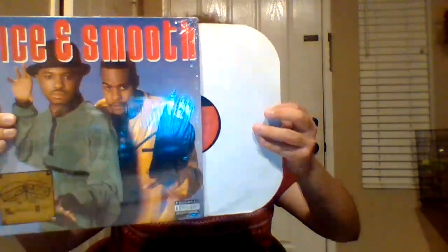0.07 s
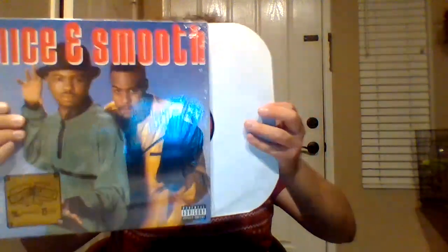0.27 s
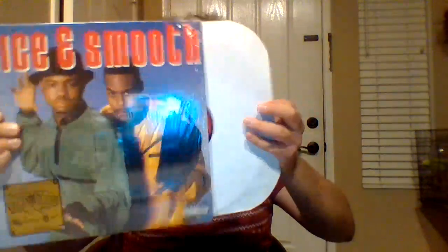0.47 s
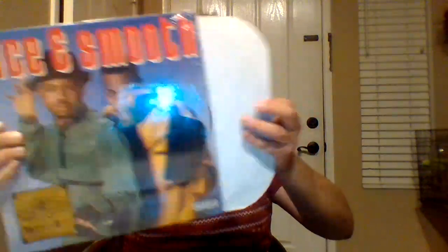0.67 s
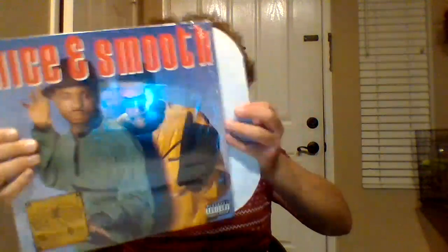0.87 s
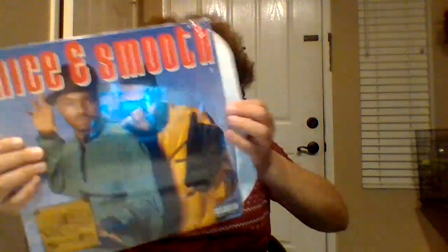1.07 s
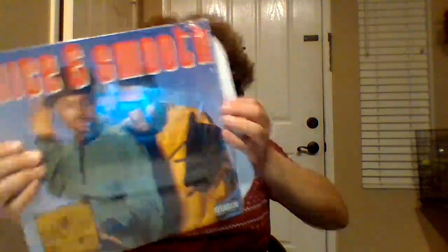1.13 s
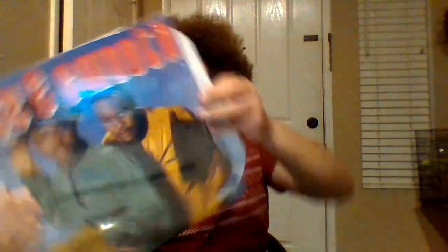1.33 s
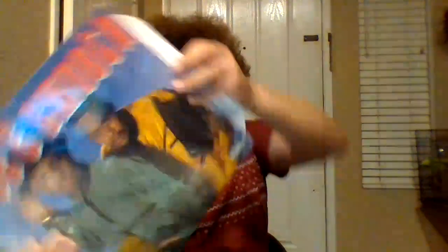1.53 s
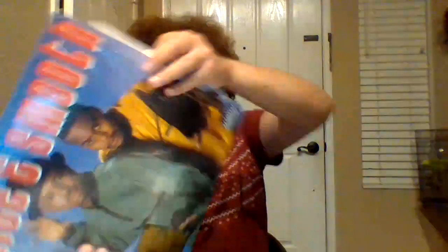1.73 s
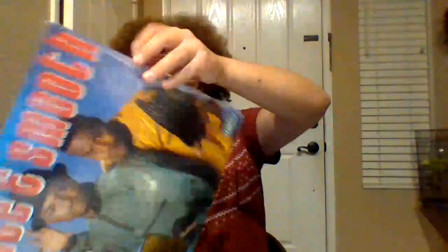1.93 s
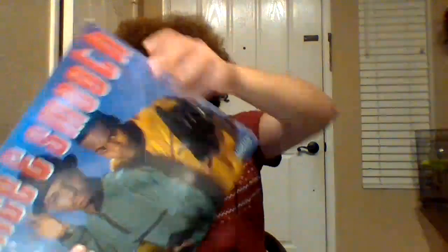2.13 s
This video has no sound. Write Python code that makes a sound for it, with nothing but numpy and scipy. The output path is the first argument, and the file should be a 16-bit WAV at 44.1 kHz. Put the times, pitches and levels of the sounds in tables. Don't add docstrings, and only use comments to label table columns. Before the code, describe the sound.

A paper record sleeve rubs and slides into a film-wrapped cardboard jacket, then the film crackles

```python
import sys
import numpy as np
from scipy import signal
from scipy.fft import rfft, irfft, next_fast_len
from scipy.io import wavfile
from scipy.ndimage import uniform_filter1d, map_coordinates

SR = 44100
rng = np.random.default_rng(int(sys.argv[2]) if len(sys.argv) > 2 else 0)


def volts(x):
    e = np.asarray(x, float) / 20
    return 10 ** e


def store_wav(level_fs):
    pcm = np.round(np.clip(np.atleast_2d(level_fs), -1, 1) * 32767)
    wavfile.write(sys.argv[1], SR, pcm.T.astype(np.int16))


N = 97020


def unit(x):
    return x / np.sqrt(np.mean(x ** 2) + 1e-20)


def along(points, hz):
    point_hz, value = np.transpose(points)
    return np.interp(np.log(hz + 1), np.log(point_hz + 1), value)


def wobble(rate):
    points = rng.standard_normal(int(N * rate / SR) + 4)
    return map_coordinates(points, [np.arange(N) * rate / SR])


def filtered(x, response):
    m = next_fast_len(N + 8192)
    hz = np.fft.rfftfreq(m, 1 / SR)
    return irfft(rfft(x, m) * response(hz), m)[..., :N]


def coloured(x, spectrum):
    return unit(filtered(x, lambda hz: volts(along(spectrum, hz))))


def flexing(x, patch_db):
    z = signal.stft(x, nperseg=512)[2]
    field = uniform_filter1d(rng.standard_normal(z.shape), size=3, axis=0)
    field = uniform_filter1d(field, size=10, axis=1)
    return unit(signal.istft(z * volts(patch_db * unit(field)), nperseg=512)[1][:N])


def slips(rate, spread_db):
    hit = rng.random(N) < rate / SR
    size_db = spread_db * np.minimum(rng.exponential(size=N), 2.5)
    sign = rng.choice([-1, 1], size=N)
    return unit(hit * sign * volts(size_db)) + 0.73 * rng.standard_normal(N)


def swell(start_s, length_s):
    now = np.arange(N) / SR
    return np.sin(np.pi * np.clip((now - start_s) / length_s, 0, 1)) ** 2


def add(track, s, sound):
    track[round(s * SR):][:len(sound)] += sound


# pitch_hz, width_hz, level_db
AIR_POCKET = [(1374, 100, -4), (1580, 78, 4), (1750, 110, 2), (2676, 163, -2.5), (3066, 260, 0.5),
              (4560, 780, -7.5), (6530, 1050, -9.5), (8600, 320, -11), (8850, 460, -16)]


def pocket(hz, pitch=1):
    f = hz / pitch
    total = 0
    for k, (centre, width, db) in enumerate(AIR_POCKET):
        total = total + (-1) ** k * volts(db) * 1j * f * width / (centre ** 2 - f ** 2 + 1j * f * width)
    return total


# time_s, rubbing_level_db, speed_db (faster is brighter)
SLEEVE_PUSHES = [
    [(.095, -90, 5), (.112, -50.5, -20), (.195, -51, -5), (.215, -39, -6.5), (.31, -41.5, -0.5),
     (.365, -33.5, 0), (.384, -34, -4.5), (.405, -52.5, -3), (.53, -72.5, -1)],
    [(.53, -70.5, 0), (.568, -39.5, -1.5), (.66, -39, 1), (.7, -49, -6), (.72, -41.5, -3), (.79, -41, 4.5),
     (.96, -39.5, 0.5), (1.0, -52, -11), (1.03, -66, 13)],
    [(1.031, -70, 0), (1.04, -49, -5), (1.085, -42, -1.5), (1.12, -39, 0), (1.2, -36.5, -1),
     (1.222, -38.5, -4), (1.232, -52, -5), (1.29, -61, -11)],
]
# time_s, rubbing_level_db, speed_db (faster is brighter)
JACKET_SHIFTS = [
    [(1.29, -60, -4), (1.299, -52, -2), (1.33, -50, 6.5), (1.345, -65.5, -27), (1.46, -68.5, -1)],
    [(1.46, -76, 2), (1.52, -60, 8.5), (1.555, -69, -4), (1.565, -53, -3), (1.65, -48.5, -4),
     (1.67, -46.5, 2), (1.71, -44, 1.5), (1.735, -61, -10)],
    [(1.735, -61, 0), (1.76, -46.5, 4.5), (1.8, -46, 0.5), (1.87, -47.5, 5), (1.91, -51, 2.5),
     (1.96, -60.5, -6), (2.03, -68, 9.5), (2.13, -67, -2), (2.2, -71, 0)],
]
BOARD_RASP_DB = [-21, -20.5, -9, -5.5, -9, -4.5]
OUTSIDE_SHARE = [0.16, 0.29, 0.54, 0.73, 0.55, 0.49]
POCKET_PITCHES = [0.994, 1.004, 1.037, 0.93, 0.988, 1.03]
# pitch_hz, level_db
OPEN_SHEET = [(530, -17), (900, -10), (1140, -3.5), (2580, 7), (3210, 3), (3700, -3.5), (6660, -32),
              (15800, -31)]
# pitch_hz, level_db
FIBRE_FIZZ = [(3000, -14), (5000, -1.5), (8000, -2), (12000, -4.5), (14500, -5), (16500, -4.5)]
# pitch_hz, level_db
BOARD_RASP = [(150, -0.5), (350, -5.5), (550, 0), (900, -5.5), (1300, 3), (2200, -16.5)]


def sleeve():
    patch_db = 1.7
    fibres = flexing(slips(5000, 3), patch_db)
    outside = flexing(coloured(slips(5000, 3), OPEN_SHEET), 2.8)
    fizz = flexing(coloured(slips(9000, 3), FIBRE_FIZZ), patch_db) * volts(wobble(40))
    rasp = coloured(slips(2000, 6.2), BOARD_RASP) * volts(1.1 * wobble(29.26))
    squeeze = np.pi / 4 * (1 + np.tanh(wobble(14)))
    t, out = np.arange(N) / SR, 0
    strokes = zip(SLEEVE_PUSHES + JACKET_SHIFTS, BOARD_RASP_DB, OUTSIDE_SHARE, POCKET_PITCHES)
    for rows, board_db, loose, pitch in strokes:
        s, level_db, speed_db = np.transpose(rows)

        def in_pocket(scale):
            return filtered(fibres, lambda hz: pocket(hz, pitch * scale) * hz ** 4 / (hz ** 4 + 1100 ** 4))

        inside = unit(np.cos(squeeze) * in_pocket(0.975) + np.sin(squeeze) * in_pocket(1.025))
        mix = np.sqrt(1 - loose) * inside + np.sqrt(loose) * outside
        mix = mix + volts(board_db) * rasp
        mix = mix + volts(-4.5 + np.interp(t, s, speed_db)) * fizz
        moving = (t >= s[0]) & (t < s[-1])
        out = out + volts(np.interp(t, s, level_db)) * moving * mix
    return out


# time_s, peak_db, pitch_hz, crack_db, ring_time_s
BOARD_KNOCKS = [(.368, -41.5, 473.5, 1, 0.13), (1.036, -46.5, 725, 2, 0.058),
                (1.0773, -32.5, 410, 4.5, 0.05), (1.0773, -37, 800, 6.5, 0.043),
                (1.0791, -28.5, 1255, -8, 0.018), (1.192, -36.5, 1154, -15, 0.097),
                (1.219, -40, 835, 7, 0.049), (1.2987, -39.5, 520, 0, 0.053), (1.3295, -40, 502, 7.5, 0.048),
                (1.329, -37.5, 990, 3, 0.019), (1.527, -50.5, 215, 10.5, 0.17),
                (1.562, -46.5, 406, -6, 0.054), (1.6292, -36, 1330, -1, 0.016),
                (1.816, -36, 2020, 13.5, 0.034), (1.8246, -33, 1580, 11.5, 0.034),
                (1.8851, -36, 897, 15, 0.057), (1.8872, -34.5, 506, 12.5, 0.062),
                (1.889, -34, 1094, 2, 0.085), (1.887, -39.5, 208.3, 8, .15),
                (1.9022, -40.5, 1840, 7, 0.046), (1.902, -37, 513, -6, 0.089),
                (1.8885, -34.5, 1440, 0, 0.037)]
# pitch_hz, level_db, ring_time (share of the knock's)
BOARD_MODES = [(205, -8, 1.5), (395, -8, .9), (505, -5, 1.0), (790, -5, .7), (1040, -3, .8), (1206, -3, .8),
               (1416, -4, .7), (1780, -5, .6)]


def knocks():
    out, cracks, t = np.zeros(N + SR), np.zeros(N + SR), np.arange(SR // 3) / SR
    crack_t60, crack_hz = 0.041, 3440
    for s, db, hz, crack_db, t60 in BOARD_KNOCKS:
        body = volts(-60 * t / t60) * np.sin(2 * np.pi * hz * t)
        for f, level, share in BOARD_MODES:
            distance_db = 7.5 * abs(np.log2(f / hz))
            mode_db = level - distance_db + rng.normal(0, 0.88)
            body = body + volts(mode_db - 60 * t / (share * t60)) * np.sin(2 * np.pi * f * t)
        add(out, s, volts(db - 4.0) * body * (1 - np.exp(-t / 0.00031)))
        crack = volts(db + crack_db - 60 * t / crack_t60) * rng.standard_normal(len(t))
        add(cracks, s, crack * (1 - np.exp(-t / 0.00039)))
    return out[:N] + filtered(cracks[:N], lambda hz: 1 / (1 + 1j * hz / crack_hz) ** 2 * hz / (hz - 700j))


# time_s, peak_db
EDGE_SNAGS = [(0.131, -32.5), (0.2121, -25), (0.2232, -25), (0.2284, -23), (0.3655, -14), (0.398, -43),
              (0.543, -41), (0.5684, -47), (1.0376, -49), (1.6707, -28), (1.08, -44), (1.112, -21),
              (1.2974, -41), (1.864, -33), (1.8857, -31), (1.945, -38), (2.0633, -40), (2.095, -44),
              (2.156, -42)]


def snags():
    out, t = np.zeros(N + SR), np.arange(400) / SR
    for s, db in EDGE_SNAGS:
        pull = 0.39 * rng.standard_normal(len(t)) - 2.28 * (t == 0)
        add(out, s, volts(db - 60 * t / 0.0043) * pull)
    return filtered(out[:N], lambda hz: 3.6 * pocket(hz) + 0.5 * hz / (hz - 2500j) / (1 + 1j * hz / 12000))


# time_s, peak_db, pitch_hz
FILM_TICKS = [(1.515, -35, 15230), (1.5328, -32, 13500), (1.6133, -37, 11800), (1.628, -40, 15000),
              (1.6435, -39, 10000), (1.646, -42, 13500), (1.759, -41, 8000), (1.727, -34, 13400),
              (1.7934, -27, 14500), (1.8238, -23.5, 12600), (1.8314, -24, 11800), (1.9455, -41, 10000),
              (1.957, -41, 14200), (1.9595, -36, 10500), (1.962, -43, 10500), (1.9744, -41, 9230),
              (1.983, -33, 10600), (2.009, -38, 14000), (2.015, -40, 11000), (2.0192, -30.5, 10200),
              (2.0258, -41, 14000), (2.0288, -41, 12500), (2.029, -48, 7000), (2.049, -40, 9500),
              (2.0528, -42, 13000), (2.066, -39.5, 10400), (2.0805, -47, 8540), (2.1188, -38, 11000),
              (2.1223, -34, 9800), (2.1265, -45, 13000), (2.129, -44, 12000), (2.1343, -36, 9400),
              (2.1365, -47, 12000), (2.144, -41, 13500)]
# start_s, length_s, level_db
FINGER_CREEPS = [
    (1.475, 0.043, -55.5),
    (1.745, 0.11, -44.5),
    (1.936, 0.076, -59),
    (1.97, 0.14, -58),
    (2.09, 0.077, -57),
    (1.097, 0.047, -45),
]
# pitch_hz, level_db
CREEP_TONE = [(5000, -15.5), (8000, -11), (11000, -10), (14500, -3.5), (16500, -18)]


def film():
    out, t = np.zeros(N + SR), np.arange(256) / SR
    tick_s, width = 0.00032, 0.21
    for s, db, hz in FILM_TICKS:
        band = np.exp(-0.5 * ((np.fft.rfftfreq(len(t), 1 / SR) / hz - 1) / width) ** 2)
        noise = unit(irfft(rfft(rng.standard_normal(len(t))) * band))
        add(out, s, volts(db) * t / tick_s * np.exp(1 - t / tick_s) * 0.39 * noise)
    grip = sum(volts(db) * swell(s, length) for s, length, db in FINGER_CREEPS)
    crackle = unit(volts(1.6 * wobble(180)) * coloured(slips(2500, 3.7), CREEP_TONE))
    return out[:N] + grip * crackle


# start_s, length_s, level_db, pitch_hz, bandwidth (share
AIR_PUFFS = [
    (0.11, 0.23, -62, 467, .12),
    (0.177, 0.18, -54, 1370, .06),
    (0.346, 0.053, -34, 1463, 0.12),
    (0.353, 0.035, -34.5, 4800, 0.042),
    (0.384, 0.12, -64, 1900, 0.55),
    (1.103, 0.03, -43, 2140, 0.062),
    (1.311, 0.029, -47, 4900, 0.15),
    (1.98, 0.039, -59, 1580, 0.27),
    (2.118, 0.028, -60.5, 1320, 0.27),
]


def puffs():
    out = 0
    for s, length, db, hz, width in AIR_PUFFS:
        noise = rng.standard_normal(N)
        band = unit(filtered(noise, lambda f: np.exp(-0.5 * ((f / hz - 1) / width) ** 2)))
        out = out + volts(db) * swell(s, length) * band
    return out


# pitch_hz, time_to_fade_60_db_s
ROOM_FADE = [(300, 0.53), (2000, 0.17), (10000, 0.28)]


def room(x):
    hz, t, z = signal.stft(rng.standard_normal(SR // 2), SR, nperseg=256)
    fade = volts(-60 * t / along(ROOM_FADE, hz)[:, None])
    tail = signal.istft(z * fade, SR, nperseg=256)[1]
    delayed = np.pad(x, (250, 0))
    return signal.fftconvolve(delayed, tail / np.linalg.norm(tail))[:N]


# pitch_hz, level_db
HUSH_TONE = [(88, -49), (150, -5), (438, -9), (575, -17), (833, -18), (901, -22), (13000, -25.5),
             (15800, -21.5)]
# pitch_hz, level_db
RUMBLE_TONE = [(5, -20), (12, 6.5), (25, 2), (45, -7), (80, -10.5), (200, -23.5)]


def floor():
    hush = coloured(rng.standard_normal(N), [(100, -65)] + list(HUSH_TONE))
    rumble = coloured(rng.standard_normal(N), list(RUMBLE_TONE) + [(300, -50)])
    return hush * volts(-61 + 1.06 * wobble(7.32)) + rumble * volts(-52.5 + 0.8 * wobble(4))


def scene():
    near = sleeve() + knocks() + snags() + film() + puffs()
    return np.tile(near + volts(-13.5) * room(near) + floor(), (2, 1))


def low_pass(x):
    return signal.sosfilt(signal.butter(12, 16800, fs=SR, output="sos"), x)


def record(dry):
    late = np.roll(dry[0], 31)
    treble = filtered(late, lambda hz: volts(-32) * hz ** 4 / (hz ** 4 + 9900 ** 4))
    side = treble * volts(3.8 * wobble(30.2))
    mix = filtered(dry + side * [[1], [-1]], lambda hz: hz < 15850)
    return low_pass(mix)


dry = scene()
out = record(dry)
store_wav(out)
```